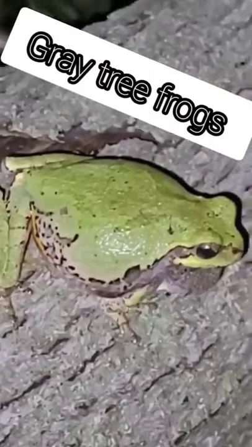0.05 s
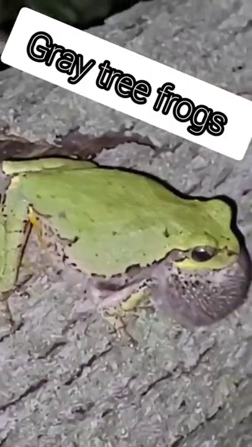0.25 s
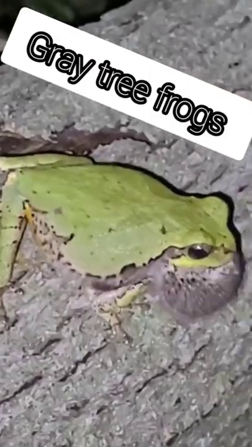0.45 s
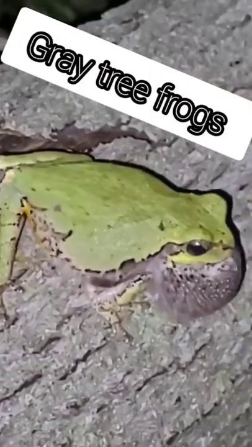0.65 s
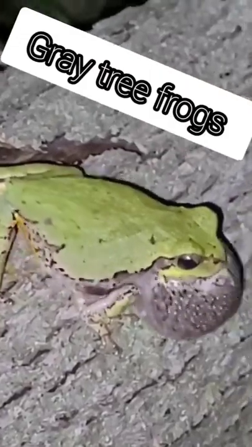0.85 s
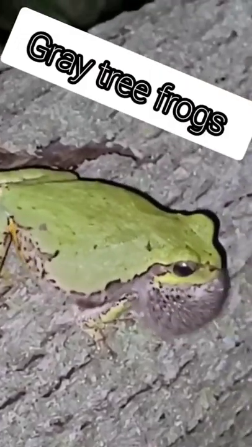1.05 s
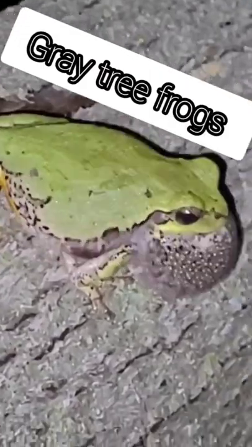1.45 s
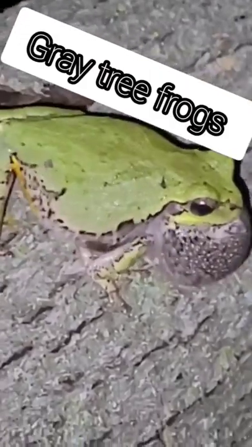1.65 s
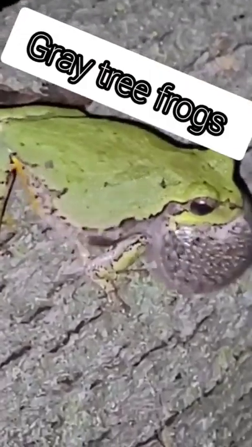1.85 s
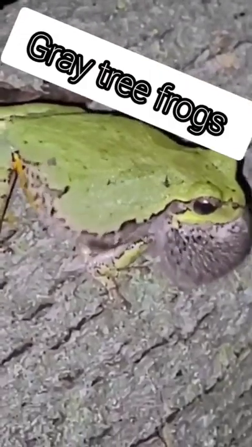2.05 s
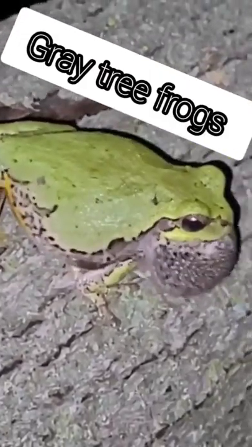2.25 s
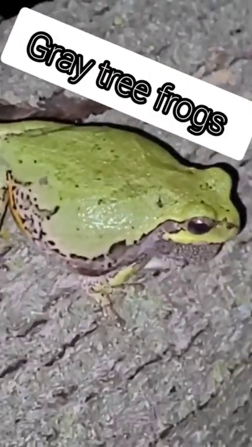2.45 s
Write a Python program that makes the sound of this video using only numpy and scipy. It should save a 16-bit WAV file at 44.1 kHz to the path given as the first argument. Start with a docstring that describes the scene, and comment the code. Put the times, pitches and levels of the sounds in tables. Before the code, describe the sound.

In the woods, a nearby tree frog trills loudly twice, each trill a rapid run of rough, rising pulses. A faint frog chorus continues behind it, while the microphone picks up a slight overload fizz and two soft bumps.

```python
"""In the woods, a tree frog on a trunk close to the microphone gives two trills of about a dozen pulses.
Each pulse catches roughly, swells, glides up and snaps shut; the vocal sac favours the octave.
Other frogs trill farther off and a small one peeps. Bark and woods add a faint echo.
The microphone overloads with a fizz on loud pulses; its right port rumbles and takes two soft bumps.
Soft low clicks come where the sound briefly drops out."""
import sys
import numpy as np
from scipy import signal
from scipy.fft import rfft, irfft
from scipy.io import wavfile
from scipy.ndimage import uniform_filter1d

SR = 44100
rng = np.random.default_rng(int(sys.argv[2]) if len(sys.argv) > 2 else 0)


def bounce(signal):
    """Save signal as a 16-bit WAV file at the path given by the first command-line argument."""
    frames = np.transpose(np.atleast_2d(signal))
    limited = np.clip(frames, -1, 1)
    pcm = np.round(limited * 32767).astype(np.int16)
    wavfile.write(sys.argv[1], SR, pcm)


N = 114660

# A pulse's three lowest partials (pure tones). A share is a fraction of the pulse's length.
# level_db, swell_db_per_pulse, top_share, sag_db_per_pulse, release_share, left_over_right_db
PARTIALS = [(-15.5, 32, 0.63, -1, 1, -1.5), (-5, 35, 0.55, 14, 0.9, -0.3), (-24.5, 18, 0.64, 3.5, 0.87, -6)]
# How late each of these partials reaches the right side: lag_ms
RIGHT_LAG_MS = [.175, .05, .13]
# Tone of the blur of many far frogs: frequency_hz, level_db
CHORUS_TONE = [(500, -44.5), (850, -31.5), (1100, -17.5), (1300, -21), (1550, -27), (1800, -23.5),
               (2020, -3.5), (2230, 1.5), (2500, -7.5), (2900, -27.5), (3350, -17.5), (3700, -23.5),
               (4100, -44), (6000, -53.5), (7800, -48), (10000, -62.5), (15000, -64)]
# Rise and fall of the far chorus: time_s, level_db
CHORUS_LEVEL = [(0, -3), (0.299, 6.5), (1.202, 3), (1.4, -1), (2.1, -1), (2.6, 1)]
# Tone of the microphone rumble: frequency_hz, level_db
RUMBLE_TONE = [(20, -13), (45, 6), (70, 3), (110, -13.5), (180, -21), (350, -27.5), (700, -39),
               (1500, -44.5)]
# Thuds (first and last: bumps; middle two: soft low clicks at the dropouts): start_s, level_db
THUDS = [(0.1904, -18.5), (1.273, -38.5), (2.505, -38), (2.582, -21)]
# Tones that ring in a thud: pitch_hz, level_db, ring_s (time to fade by 60 dB)
THUD_TONES = [(72, -8.5, 0.19), (121, -2.5, 0.071), (348, -5, 0.013), (704, -17.5, 0.014)]
# Pulses of a neighbouring frog: start_s, level_db
NEIGHBOUR_PULSES = [(.005, -33), (.078, -28.5), (.150, -28), (.225, -25.5), (0.298, -31.5), (0.374, -37),
                    (0.441, -29), (1.145, -34), (1.179, -29.5), (1.226, -31), (1.344, -44.5),
                    (2.332, -29.5), (2.408, -32)]
# Peeps of a small far frog: start_s, level_db
PEEPS = [(0.086, -54.5), (1.247, -63), (2.573, -54)]
# Pulses of the near frog: start_s, length_s, level_db, pitch_ratio, octave_db
NEAR_PULSES = [(0.205, 0.02, 1.5, 1.002, -20), (0.276, 0.034, 1.5, 0.98, -3),
               (0.3505, 0.036, 0.5, 1.006, 1.5), (0.414, 0.036, 0, 1.015, 0),
               (0.496, 0.036, 0.5, 1.011, -0.5), (0.5797, 0.035, 0.5, 1.01, -0.5),
               (0.6618, 0.037, -0.5, 1.014, 0), (0.7488, 0.036, 0, 1.017, -0.5),
               (0.8341, 0.038, -0.5, 1.02, 0.5), (0.922, 0.034, -0.5, 1.02, 0),
               (1.0118, 0.035, 0, 1.013, -0.5), (1.102, 0.027, -1.5, 1.004, -2),
               (1.461, 0.025, 2.5, 1, -18.5), (1.5247, 0.036, 2, 0.98, -2.5), (1.6014, 0.036, 1, 1.006, 0),
               (1.6818, 0.035, 0, 1.012, 1), (1.7625, 0.035, 0, 1.014, 1), (1.8476, 0.036, 0, 1.01, 0.5),
               (1.9318, .038, -0.5, 1.014, 1), (2.018, 0.035, 0, 1.013, 1),
               (2.1055, 0.036, -0.5, 1.014, 0.5), (2.194, 0.033, -0.5, 1.018, 1),
               (2.2835, 0.036, -0.5, 1.014, 0.5)]
# Tone of the catch, the rough puff that opens a pulse: frequency_hz, level_db
CATCH_TONE = [(500, -58), (850, -24), (1100, -4.5), (1650, -17.5), (2150, -2), (2750, -13.5), (3400, -18),
              (5000, -52), (9000, -65.5)]
# Tone of the microphone's overload fizz: frequency_hz, level_db
FIZZ_TONE = [(300, -27), (700, -16), (1500, 14), (3000, 7.5), (4200, 5), (5500, -9), (7700, -1), (9200, -4),
             (11900, -4), (12900, -22), (14400, -7), (15800, -23.5)]
# Dropouts, brief dips in level: start_s, length_s
DIPS = [(1.275, 0.0065), (1.282, 0.0076), (2.494, 0.0076), (2.506, 0.0042)]

LEAD_S, PULSE_SAMPLES = 0.02, 4096  # a pulse fades in during the lead before its start
NEIGHBOUR_LENGTH_S, NEIGHBOUR_PITCH_RATIO = 0.04, 0.96


def undb(db):
    """Turn decibels into a gain."""
    return 10 ** (np.asarray(db) / 20)


def unit(x):
    """Scale to an average (rms) level of 1."""
    return x / np.sqrt(np.mean(x ** 2) + 1e-20)


def noise(tone):
    """Noise shaped by a tone table, unrelated left and right."""
    hz, db = np.array(tone).T
    bins_hz = np.maximum(np.fft.rfftfreq(N, 1 / SR), 1)
    gain = undb(np.interp(np.log(bins_hz), np.log(hz), db))
    return unit(irfft(rfft(rng.standard_normal((2, N))) * gain, N))


def drift(rate_hz):
    """A smooth random wander of typical size 1."""
    width = int(SR / rate_hz)
    smoothed = uniform_filter1d(rng.standard_normal(N), width, mode="wrap")
    return unit(uniform_filter1d(smoothed, width, mode="wrap"))


def add(out, x, start_s):
    """Mix x into out from a given time."""
    i = int(round(start_s * SR))
    lo, hi = max(i, 0), min(i + x.shape[-1], N)
    if hi > lo:
        out[..., lo:hi] += x[..., lo - i:hi - i]


def echo(x, ring_s):
    """Many reflections blend into a tail that fades by 60 dB in ring_s."""
    t = np.arange(SR) / SR
    tail = rng.standard_normal((2, SR)) * np.exp(-np.log(1000) * t / ring_s)
    return signal.fftconvolve(x, unit(tail) / np.sqrt(SR), axes=1)[:, :N]


def frog_pulse(length_s, pitch_ratio, octave_db):
    """One note climbs and flicks up as the larynx shuts; with a slack vocal sac it arches over."""
    t = np.arange(PULSE_SAMPLES) / SR - LEAD_S
    share = t / length_s
    pitch_wobble, level_wobble = [unit(signal.fftconvolve(row, np.hanning(220), "same"))
                                  for row in rng.standard_normal((2, PULSE_SAMPLES))]
    slack = (1 - undb(min(octave_db, 0))) ** 2  # a weak octave means a slack sac
    climb_hz = 990.6 + 235.7 * np.clip(share, 0, 1)
    flick_hz = 247 / (1 + np.exp(np.clip((1 - share) / 0.062, -20, 20)))
    arch_hz = 210 * np.exp(-((share - 0.79) / 0.22) ** 2 / 2)
    glide_hz = climb_hz + (1 - slack) * flick_hz + slack * arch_hz
    hz = pitch_ratio * glide_hz * (1 + 0.0026 * pitch_wobble)
    cycles = np.cumsum(hz) / SR + rng.random()
    out = np.zeros((2, PULSE_SAMPLES))
    for k in range(1, 8):
        row = min(k, 3) - 1
        db, swell, top, sag, release, left_db = PARTIALS[row]
        if k <= 3:
            db += octave_db * (0, 1, 0.7)[row]
        else:  # higher partials are ever fainter copies of the third
            db += -25 - 12.5 * (k - 4) + 0.085 * octave_db
        body_db = -swell * np.maximum(top - share, 0) - sag * np.maximum(share - top, 0)
        opening_db = -1900.5 * np.maximum(-t, 0)
        closing_db = -4297.5 * np.maximum(t - release * length_s, 0)
        rounded_db = uniform_filter1d(body_db + opening_db + closing_db, int(0.03 * length_s * SR))
        gain = undb(db + rounded_db + 0.09 * level_wobble)
        lag_s = RIGHT_LAG_MS[row] / 1000
        out[0] += gain * undb(left_db / 2) * np.sin(2 * np.pi * k * cycles)
        out[1] += gain * undb(-left_db / 2) * np.sin(2 * np.pi * k * (cycles - hz * lag_s))
    return out


def far_chorus(frog_count=8, pulse_count=14):
    """Distant frogs trill at their own pitch and pace, over the blur of many more."""
    trills = np.zeros((2, N))
    for frog in range(frog_count):
        when, pace, pitch = rng.uniform(-1, 1, 3)
        start_s = (frog + when / 2 - 1) / frog_count * N / SR
        pulses_per_s = 12 * (1 + 0.086 * pace)
        note = frog_pulse(NEIGHBOUR_LENGTH_S, NEIGHBOUR_PITCH_RATIO * (1 + 0.05 * pitch), octave_db=0)
        for k in range(pulse_count):
            add(trills, note, start_s + k / pulses_per_s)
    blur = noise(CHORUS_TONE) * undb(2 * drift(rate_hz=25))
    level = undb(np.interp(np.arange(N) / SR, *np.array(CHORUS_LEVEL).T))
    return level * (undb(-48) * unit(echo(trills, ring_s=0.08)) + undb(-44) * blur)


def rumble_and_thuds():
    """Microphone rumble, two bumps, and soft low clicks where the sound drops out; mostly on the right."""
    t = np.arange(SR // 2) / SR
    thud = sum(undb(db) * np.sin(2 * np.pi * hz * t) * np.exp(-np.log(1000) * t / ring_s)
               for hz, db, ring_s in THUD_TONES)
    out = undb(-49) * noise(RUMBLE_TONE) * undb(0.5 * drift(rate_hz=14))
    for start_s, db in THUDS:
        add(out, -undb(db) * thud, start_s)
    return out * undb([[-29], [0]])  # left, right


def neighbour_frog():
    """Quiet pulses from a frog some metres away."""
    out = np.zeros((2, N))
    for start_s, db in NEIGHBOUR_PULSES:
        note = frog_pulse(NEIGHBOUR_LENGTH_S, NEIGHBOUR_PITCH_RATIO, octave_db=-1.5)
        add(out, undb(db) * note, start_s - LEAD_S)
    return out


def peeping_frog(pitch_hz=3147, rise_hz=169, length_s=0.21):
    """A small frog far off gives thin whistles that slide up."""
    share = np.arange(int(length_s * SR)) / SR / length_s
    cycles = np.cumsum(pitch_hz + rise_hz * share) / SR
    note = np.sin(2 * np.pi * cycles) * np.sin(np.pi * np.sqrt(share))
    out = np.zeros((2, N))
    for start_s, db in PEEPS:
        add(out, undb(db) * note, start_s)
    return out


def near_frog(blip_hz=2146):
    """Two trills of clean notes, each with a rough catch at its start."""
    t = np.arange(N) / SR
    notes, catch_gain = np.zeros((2, N)), np.zeros(N)
    for start_s, length_s, db, pitch_ratio, octave_db in NEAR_PULSES:
        add(notes, undb(db) * frog_pulse(length_s, pitch_ratio, octave_db), start_s - LEAD_S)
        share = (t - start_s) / length_s
        catch_gain += undb(db + 0.42 * octave_db) * np.exp(-((share - 0.11) / 0.072) ** 2 / 2)
    puff = undb(-28) * noise(CATCH_TONE)[0]
    octave_blip = undb(-20) * np.sin(2 * np.pi * blip_hz * t)
    return notes + catch_gain * (puff + octave_blip)


def overload_fizz(right_cutoff_hz=4320):
    """Fizz of the microphone overloading on loud pulses, mostly on the left."""
    gain = np.zeros(N)
    for start_s, length_s, db, pitch_ratio, octave_db in NEAR_PULSES:
        share = (np.arange(N) / SR - start_s) / length_s
        fizz_db = 0.93 * (db + octave_db) - 82.5 * max(1 - pitch_ratio, 0)  # weaker on flat notes
        gain += undb(fizz_db) * np.exp(-((share - 0.56) / 0.46) ** 4 / 2)
    left, right = noise(FIZZ_TONE)
    duller = signal.butter(1, right_cutoff_hz, fs=SR, output="sos")
    return undb(-41.5) * gain * np.array([left, undb(-7) * signal.sosfilt(duller, right)])


def scene():
    """All the sounds together; the closest ones echo off the bark and through the woods."""
    close = near_frog() + overload_fizz() + neighbour_frog()
    bark = undb(-20) * echo(close, ring_s=0.027)
    woods = undb(-29) * echo(close, ring_s=0.27)
    return close + bark + woods + far_chorus() + peeping_frog() + rumble_and_thuds()


def record(dry, dip_db=-21.5, cutoff_hz=15700):
    """The sound drops out in two quick pairs of dips, and the highest treble is cut."""
    t = np.arange(N) / SR
    in_dip = sum((t > start_s) & (t < start_s + length_s) for start_s, length_s in DIPS)
    gain = uniform_filter1d(undb(dip_db * in_dip), size=22)
    treble_cut = signal.ellip(8, 0.2, 70, cutoff_hz, fs=SR, output="sos")
    return signal.sosfilt(treble_cut, dry * gain)


dry = scene()
out = record(dry)
bounce(out)
```